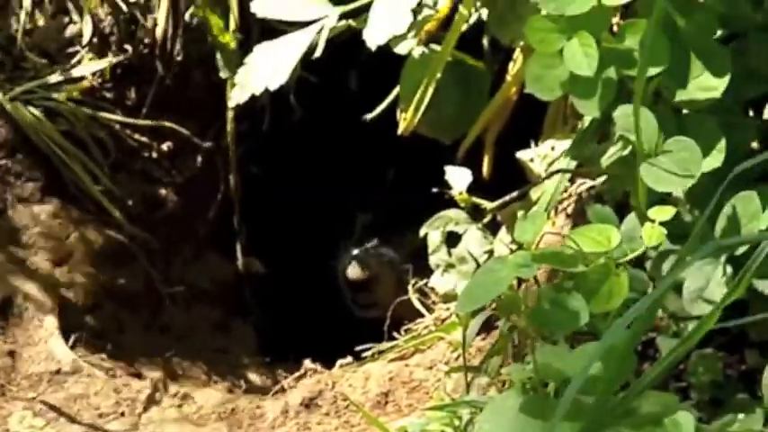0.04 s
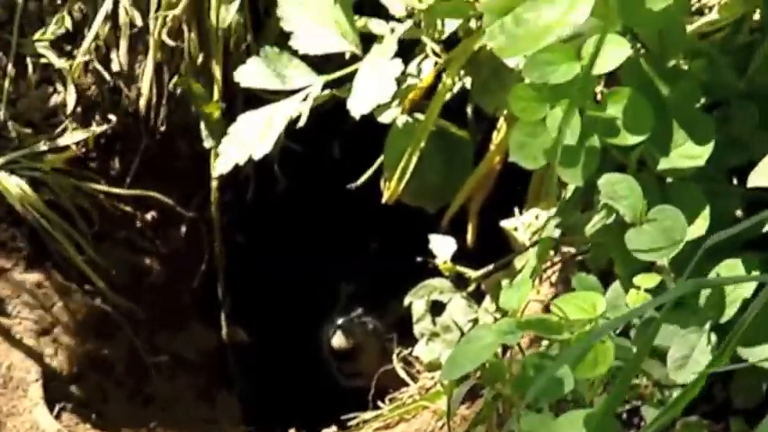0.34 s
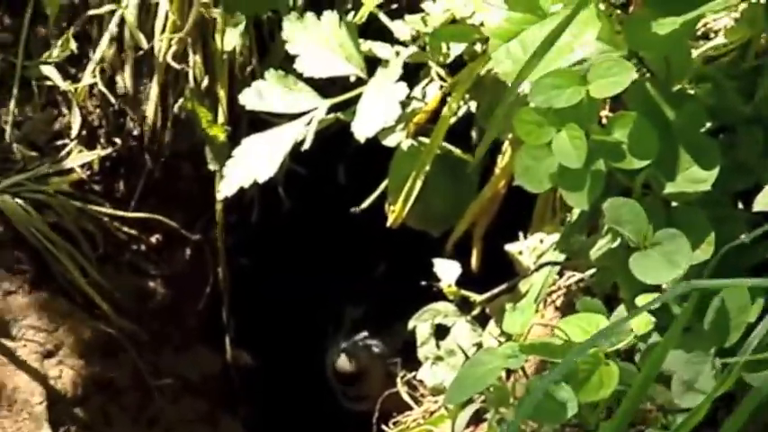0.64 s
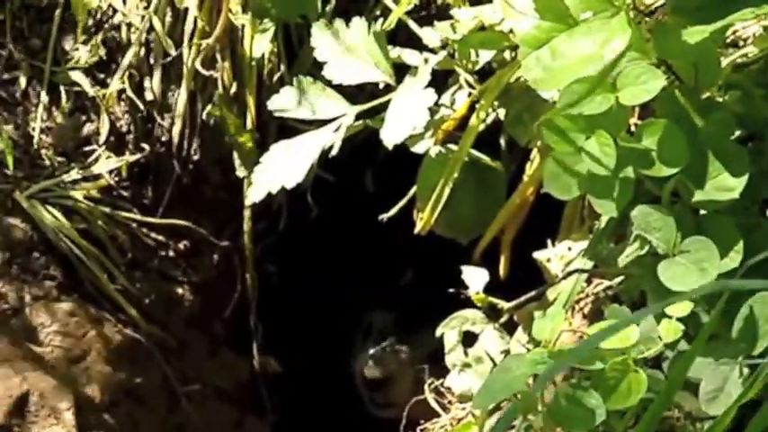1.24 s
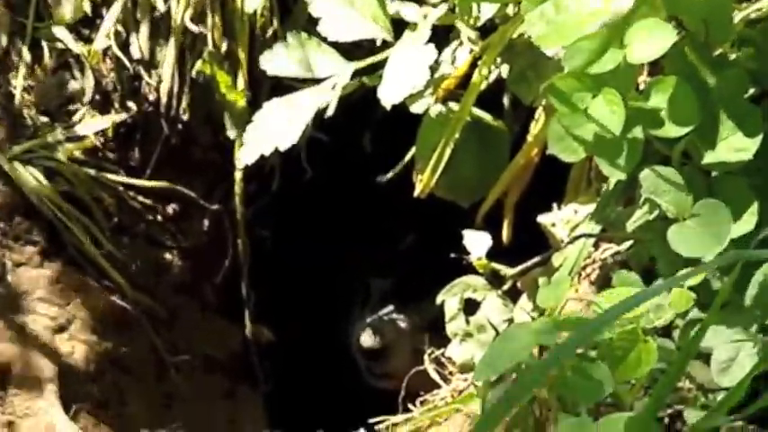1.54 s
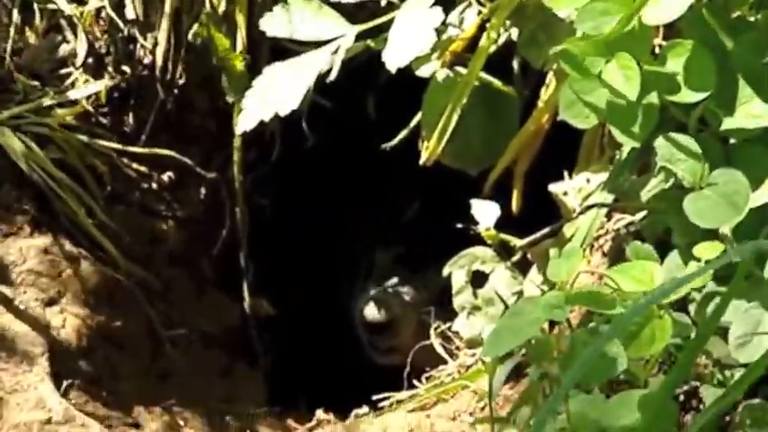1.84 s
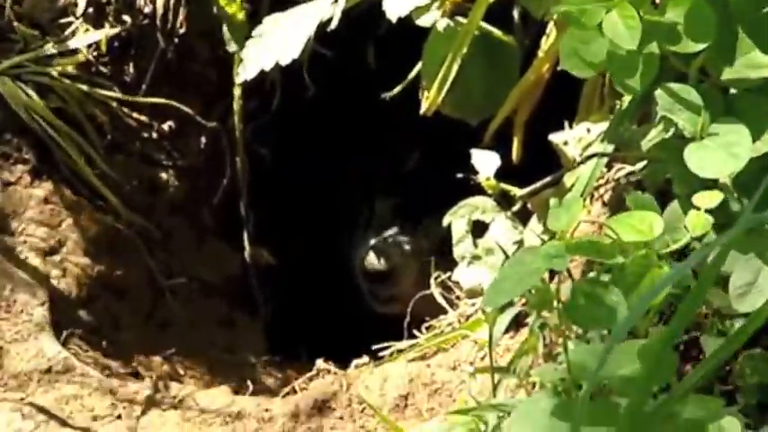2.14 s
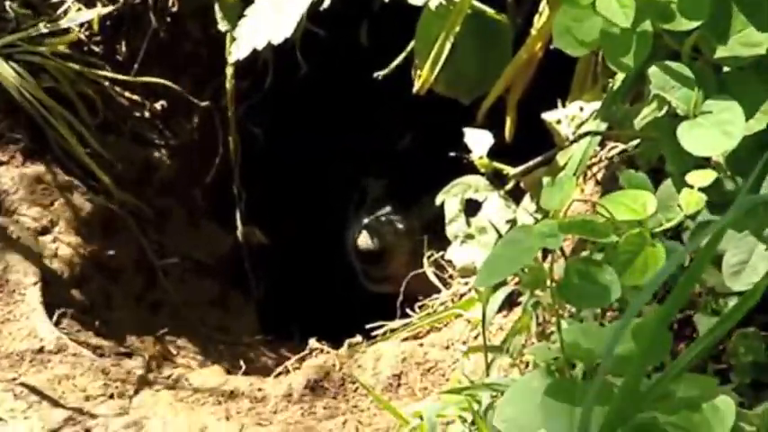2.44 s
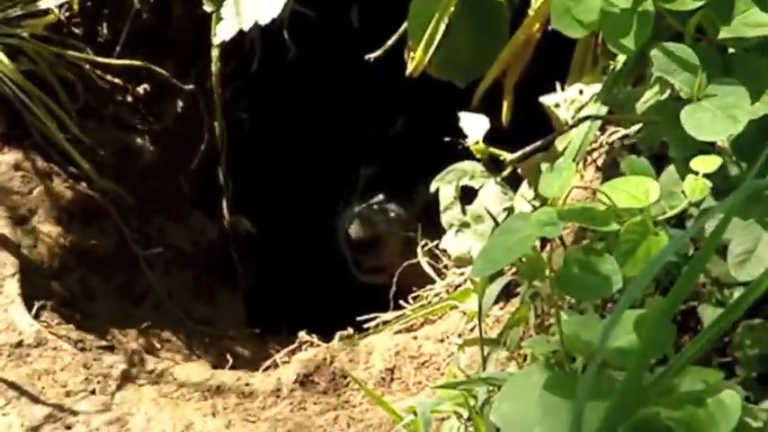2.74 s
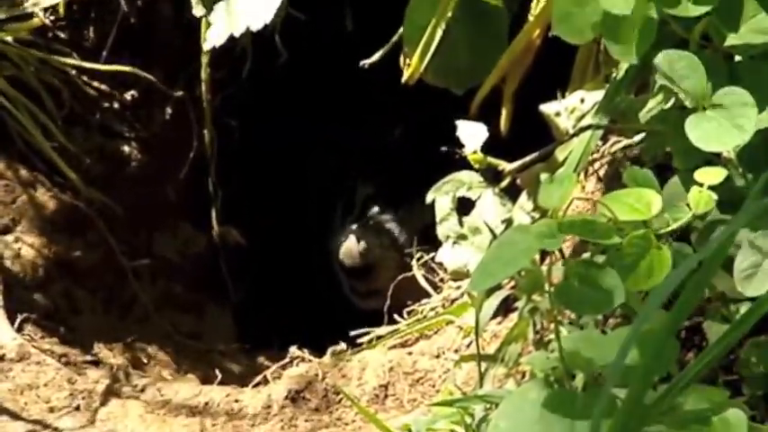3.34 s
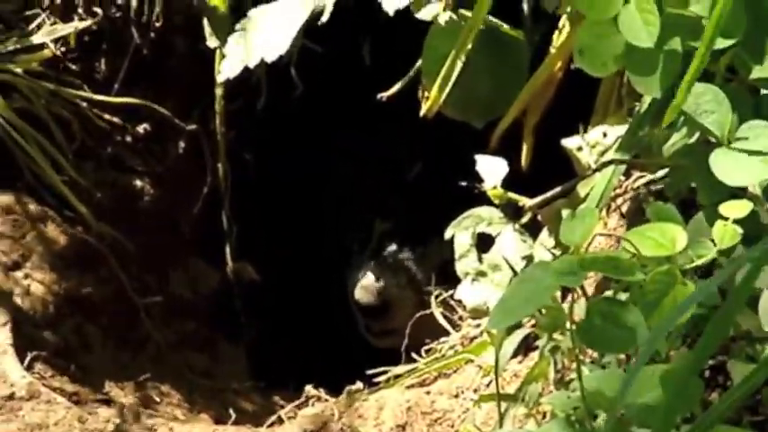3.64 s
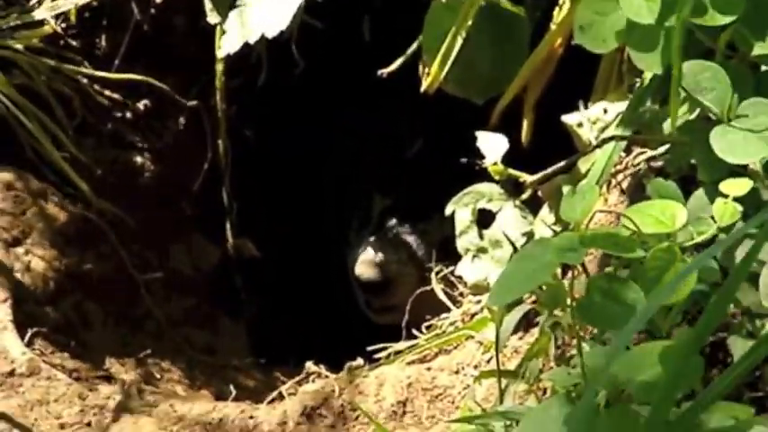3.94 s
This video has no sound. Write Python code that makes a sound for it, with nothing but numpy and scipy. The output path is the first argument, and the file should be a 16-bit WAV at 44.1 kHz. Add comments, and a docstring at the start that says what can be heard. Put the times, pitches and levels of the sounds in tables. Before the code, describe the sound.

One sharp falling chirp from a small burrowing animal, over faint distant birds.

```python
"""Alarm chirp at a burrow

Close by, a small burrowing animal gives one sharp chirp: a fluttering harmonic tone that falls in
pitch and scatters off the bank and plants. Far songbirds whistle gliding pure tones that reverberate
in the trees, over a soft hush of broadband noise and a blurred, very far call. Light gusts buffet
the microphone with low turbulence, and a few dry ticks sound nearby as damped bursts of noise."""
import sys
import numpy as np
from scipy import signal
from scipy.fft import rfft, irfft, next_fast_len
from scipy.io import wavfile
from scipy.ndimage import map_coordinates

SR = 44100
rng = np.random.default_rng(int(sys.argv[2]) if len(sys.argv) > 2 else 0)


def generate_wav(sig):
    """Save sig (samples, or channels by samples) to the path in sys.argv[1] as 16-bit PCM at SR."""
    pcm = np.round(np.clip(np.atleast_2d(sig).T, -1, 1) * 32767).astype(np.int16)
    wavfile.write(sys.argv[1], SR, pcm)


N = 176400

# spectrum of air and far foliage (frequency [Hz], level [dB])
HUSH_SPECTRUM = [(15, -29.5), (25, -5), (53, -1), (156, -6.5), (264, -3), (546, -5.5), (719, -1),
                 (795, -3.5), (1100, -2), (1280, -5.5), (1490, -4.5), (1820, -7), (2220, -6), (2780, -10),
                 (3160, -9), (3580, -11), (7780, -17.5), (10000, -26), (13000, -80.5), (22000, -120)]
# slow course of the hush (time [s], level [dB])
HUSH_ENVELOPE = [(0, -44.5), (.8, -45), (1.5, -45.5), (2.3, -46), (3.1, -47.5), (4, -47)]
HUSH_DRIFT_DB, WHINE_DB, WHINE_HZ = 0.6, -73.5, 7876

# far birdsong (time [s], duration [s], first pitch [Hz], last pitch [Hz], level [dB])
BIRD_NOTES = [ (0.01, 0.042, 3565, 2450, -42.5), (0.272, 0.083, 4220, 3930, -46.5),
              (0.39, 0.074, 3280, 2647, -44), (0.426, 0.036, 4140, 3990, -47),
              (0.587, 0.052, 7470, 6970, -54), (0.649, .22, 4350, 4215, -46),
              (0.776, 0.075, 5470, 5260, -51.5), (0.771, 0.059, 2830, 2640, -48),
              (0.838, 0.024, 3800, 3490, -40.5), (0.959, 0.026, 3590, 3470, -48),
              (1.196, 0.038, 3470, 3540, -51.5), (1.367, .025, 2690, 2250, -40),
              (1.505, 0.087, 3730, 3500, -49), (1.56, 0.12, 3444, 3024, -42),
              (1.762, 0.094, 2403, 2270, -48.5), (1.88, 0.08, 2328, 2245, -44.5),
              (2.077, 0.037, 3050, 3430, -45), (2.142, 0.15, 5800, 5530, -50.5),
              (2.747, .025, 3050, 2590, -42), (2.766, 0.036, 2700, 2350, -40.5),
              (3.214, 0.03, 4850, 3515, -45), (3.728, 0.029, 3480, 2485, -40.5),
              (3.752, .03, 2596, 3030, -46), (3.78, 0.041, 3000, 2695, -46)]
WHISTLE_EDGE_S, SONG_FLICKER_DB = 0.0062, 3.2
WARBLE, WARBLE_NOTE_S = 0.0182, 0.05  # relative pitch unsteadiness in a note of this duration

# gusts on the microphone (time [s], duration [s], level [dB])
GUST_EVENTS = [(1.149, .18, -48), (1.6, 0.11, -37), (1.702, 0.13, -43.5), (1.801, 0.089, -32),
               (1.891, 0.089, -35.5), (2.021, 0.063, -35.5), (2.089, 0.32, -43), (2.33, 0.14, -40),
               (2.451, 0.13, -36), (2.56, 0.12, -32), (2.745, 0.073, -40), (3.187, 0.057, -41.5),
               (3.254, .1, -41)]
# spectrum of their rumble (frequency [Hz], level [dB])
GUST_SPECTRUM = [(20, -15), (40, -7), (65, 0.5), (130, -0.5), (220, -6.5), (330, -16), (500, -28.5),
                 (3000, -90)]
# the hardest eddies (time [s], duration [s], level [dB])
EDDY_EVENTS = [(1.825, 0.025, -36.5), (1.857, 0.014, -29), (1.925, .012, -39.5), (2.574, 0.015, -28),
               (2.657, 0.0127, -33), (3.22, 0.014, -39)]
# spectrum of their slaps (frequency [Hz], level [dB])
EDDY_SPECTRUM = [(60, -16), (160, 4), (280, -0.5), (400, -0.5), (560, -22), (1200, -43), (3000, -72)]
GUST_EDGE_S, EDDY_EDGE_S, LUMP_DB, LUMP_HZ = 0.021, 0.0025, 3.5, 90.7

# dry ticks (time [s], level [dB], band centre [Hz], band width [octaves], decay time [s])
TICK_EVENTS = [(1.27, -31.5, 1730, 0.37, 0.0076), (2.744, -35.5, 3540, .16, 0.0077),
               (3.2955, -33, 4540, 0.68, .0015), (3.31, -31, 1500, 1.06, 0.0018),
               (3.744, -43, 4000, 1.2, .002), (3.765, -44, 7000, 0.44, 0.0023)]

# swells of the very far call (time [s], duration [s], level [dB])
FAR_CALL_EVENTS = [(1.27, .5, -53), (1.8, 0.41, -52.5), (3.74, .17, -53)]
FAR_CALL_HZ, FAR_CALL_HALF_WIDTH_HZ = 1413, 64

# spectrum of the hoarse air before the voice starts (frequency [Hz], level [dB])
BREATH_SPECTRUM = [(100, -9), (700, 5.5), (1500, -14), (2600, 9), (3400, 2), (4500, -18), (6000, -39),
                   (10000, -38)]
BREATH_END_DB, BREATH_S, BREATH_RISE_DB = -26.5, 0.032, 14
POP_DB, POP_DECAY_S = -29, 0.0015

# course of the alarm chirp (time [s], pitch [Hz], level [dB])
CHIRP_CONTOUR = [(2.9153, 2768, -39), (2.9172, 2727, -5), (2.92, 2580, -12), (2.933, 2683, -8.5),
                 (2.946, 2712, -13.5), (2.952, 2620, -12), (2.962, 2500, -12), (2.967, 2290, -13),
                 (2.974, 2122, -13.5), (2.976, 1863, -25), (2.987, 1436, -39.5)]
# its overtones (harmonic number, level at high pitch [dB], level at low pitch [dB])
CHIRP_OVERTONES = [(2, -24.5, -7), (3, -39.5, -19), (4, -53, -30)]
# spectrum of the air in the voice (frequency [Hz], level [dB])
RASP_SPECTRUM = [(200, -8), (1300, -27.5), (2200, -18), (3000, 12), (4000, -15), (5200, -15), (6500, -19),
                 (8000, -16), (10000, -27)]
RASP_DB, JITTER = -19, 0.0129  # air relative to the voice; random share of pitch
PURE_HZ, HARSH_HZ = 2480, 2120  # the voice turns harsh as it falls between these pitches
FLUTTER_HZ, FLUTTER_DIP_DB, FLUTTER_PITCH_DIP = 215.6, 7.5, 0.11  # brief catches in the voice

# scattering by leaves, which throw back the treble best (frequency [Hz], gain [dB])
LEAF_SCATTER = [(1000, -19.5), (2100, -2), (2700, 1.5), (4400, 7.5), (6500, 4), (10000, -15)]
# reverberation among the trees (frequency [Hz], time to fall 60 dB [s])
TREE_T60 = [(300, .3), (2500, 0.48), (5000, 0.64), (10000, 0.47)]
NEAR_ECHO_DB, NEAR_T60_S = -17, 0.3
CHIRP_ECHO_DB, BIRD_ECHO_DB, TICK_ECHO_DB = -25, -1, -5.5
BAND_LIMIT_HZ = 10150

TIME = np.arange(N) / SR


def amp(db):
    """Amplitude grows tenfold for every 20 dB."""
    return 10 ** (np.asarray(db) / 20)


def unit_rms(x):
    """Normalisation to a mean power of one."""
    return x / np.sqrt(np.mean(x ** 2) + 1e-20)


def along(points, hz):
    """Interpolation of (frequency, value) points on a logarithmic frequency axis."""
    frequencies, values = np.transpose(points)
    return np.interp(np.log(hz + 1), np.log(frequencies + 1), values)


def curves(rows):
    """Linear interpolation in time of each column after the first."""
    times, *columns = np.transpose(rows)
    return [np.interp(TIME, times, column) for column in columns]


def wobble(rate_hz):
    """Random modulation: a smooth curve through rate_hz random values a second."""
    return map_coordinates(rng.standard_normal(N // 8), [TIME * rate_hz], mode="wrap")


def gate(start, length, edge_s):
    """A raised-cosine window: soft rise, hold and soft fall."""
    age = TIME - start
    ramp = np.clip(np.minimum(age, length - age) / edge_s + 0.25, 0, 1)
    return np.sin(np.pi / 2 * ramp) ** 2


def swells(events, edge_s):
    """Incoherent addition: the envelopes of the events sum in power."""
    return np.sqrt(sum((amp(db) * gate(start, length, edge_s)) ** 2 for start, length, db in events))


def phase_of(hz):
    """Phase is the time integral of angular frequency."""
    return 2 * np.pi * np.cumsum(hz) / SR


def filtered(x, response):
    """Linear filtering multiplies the spectrum by a frequency response."""
    size = next_fast_len(N + SR // 2)
    return irfft(rfft(x, size) * response(np.fft.rfftfreq(size, 1 / SR)), size)[:N]


def noise(response):
    """Filtered white noise takes the shape of the response; its rms is one."""
    return unit_rms(filtered(rng.standard_normal(N), response))


def coloured_noise(spectrum):
    """Spectral shaping of noise by (frequency, level) points."""
    return noise(lambda hz: amp(along(spectrum, hz)))


def hush():
    """Air and far foliage add up to broadband noise, with a thin steady tone beneath it."""
    level_db, = curves(HUSH_ENVELOPE)
    air = amp(level_db + HUSH_DRIFT_DB * wobble(rate_hz=7.93)) * coloured_noise(HUSH_SPECTRUM)
    whine = amp(WHINE_DB) * np.sin(2 * np.pi * WHINE_HZ * TIME)
    return air + whine


def songbirds():
    """Frequency modulation: pure tones glide and settle, and the briefest waver most."""
    song, waver = np.zeros(N), wobble(rate_hz=260)
    for start, length, first_hz, last_hz, db in BIRD_NOTES:
        remaining = np.clip(1 - (TIME - start) / length, 0, 1)
        glide = last_hz + (first_hz - last_hz) * remaining ** 2
        pitch = glide * (1 + WARBLE * WARBLE_NOTE_S / length * waver)
        song += amp(db) * gate(start, length, WHISTLE_EDGE_S) * np.sin(phase_of(pitch))
    return song * amp(SONG_FLICKER_DB * wobble(rate_hz=90))


def wind():
    """Turbulent pressure: gusts shake the microphone in low lumps; eddies slap it at higher pitch."""
    lumps = amp(LUMP_DB * wobble(LUMP_HZ))
    rumble = unit_rms(lumps * coloured_noise(GUST_SPECTRUM))
    slaps = coloured_noise(EDDY_SPECTRUM)
    return swells(GUST_EVENTS, GUST_EDGE_S) * rumble + swells(EDDY_EVENTS, EDDY_EDGE_S) * slaps


def ticks():
    """Damped transients: each dry tick is a band of noise that decays exponentially."""
    clicks = np.zeros(N)
    for start, db, centre_hz, octaves, decay_s in TICK_EVENTS:
        band = noise(lambda hz: 1 / (1 + (np.log2((hz + 1) / centre_hz) / octaves) ** 2 / 2) ** 2)
        clicks += amp(db) * (TIME > start) * np.exp(-abs(TIME - start) / decay_s) * band
    return clicks


def far_call():
    """Narrow-band noise has a blurred pitch: a low call smeared by distance."""
    band = noise(lambda hz: 1 / (1 + ((hz - FAR_CALL_HZ) / FAR_CALL_HALF_WIDTH_HZ) ** 2))
    return swells(FAR_CALL_EVENTS, edge_s=0.06) * band


def chirp_onset():
    """Attack transient: hoarse air swells and ends in a small pop as the voice starts."""
    start = CHIRP_CONTOUR[0][0]
    age = TIME - start
    breath_db = BREATH_END_DB - BREATH_RISE_DB * abs(age) / BREATH_S
    breath = gate(start - BREATH_S, BREATH_S, edge_s=0.003) * amp(breath_db)
    pop = amp(POP_DB) * (age > 0) * np.exp(-abs(age) / POP_DECAY_S)
    return breath * coloured_noise(BREATH_SPECTRUM) + pop * coloured_noise(HUSH_SPECTRUM)


def alarm_chirp():
    """Fast modulation is heard as roughness: a fluttering whistle holds, drops and gains overtones."""
    start, end = CHIRP_CONTOUR[0][0], CHIRP_CONTOUR[-1][0]
    pitch, level_db = curves(CHIRP_CONTOUR)
    flutter_hz = FLUTTER_HZ * (1 + 0.21 * wobble(rate_hz=120))
    catches = np.cos(phase_of(flutter_hz) / 2) ** 10  # one narrow pulse per flutter cycle
    phase = phase_of(pitch * (1 - FLUTTER_PITCH_DIP * catches + JITTER * wobble(rate_hz=900)))
    harshness = np.clip((PURE_HZ - pitch) / (PURE_HZ - HARSH_HZ), 0, 1)
    voice = np.sin(phase)
    for harmonic, pure_db, harsh_db in CHIRP_OVERTONES:
        voice += amp(pure_db + harshness * (harsh_db - pure_db)) * np.sin(harmonic * phase)
    rasp = amp(RASP_DB) * coloured_noise(RASP_SPECTRUM)
    envelope = amp(level_db - FLUTTER_DIP_DB * catches) * (TIME > start) * (TIME < end)
    return envelope * (np.sqrt(2) * voice + rasp)


def reverberation(x, t60_points):
    """A diffuse field: convolution with a noise tail in which each frequency decays at its own rate."""
    hz, age, spectra = signal.stft(rng.standard_normal(SR // 2), SR, nperseg=256)
    decay = amp(-60 * age / along(t60_points, hz)[:, None])
    _, tail = signal.istft(spectra * decay, SR, nperseg=256)
    impulse_response = np.pad(tail / np.linalg.norm(tail), (SR // 250, 0))  # 4 ms delay
    return signal.fftconvolve(x, impulse_response)[:N]


def scene():
    """Superposition of direct sound, the chirp scattered by bank and plants, and echoes in the trees."""
    chirp = alarm_chirp() + chirp_onset()
    song, clicks = songbirds(), ticks()
    scattered = filtered(chirp, lambda hz: amp(along(LEAF_SCATTER, hz)))
    near_echo = amp(NEAR_ECHO_DB) * reverberation(scattered, [(2500, NEAR_T60_S)])
    into_trees = amp(CHIRP_ECHO_DB) * scattered + amp(BIRD_ECHO_DB) * song + amp(TICK_ECHO_DB) * clicks
    tree_echo = reverberation(into_trees, TREE_T60)
    return (chirp + song + clicks + near_echo + tree_echo + far_call() + wind() + hush())[None]


def record(dry):
    """Steep low-pass filtering: the camera keeps nothing above its band limit."""
    return filtered(dry[0], lambda hz: 1 / np.sqrt(1 + (hz / BAND_LIMIT_HZ) ** 200))[None]


dry = scene()
out = record(dry)
generate_wav(out)
```